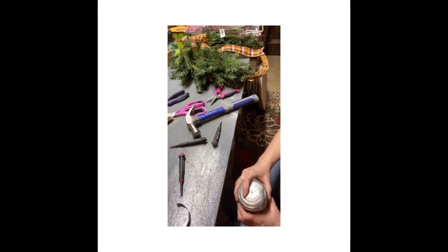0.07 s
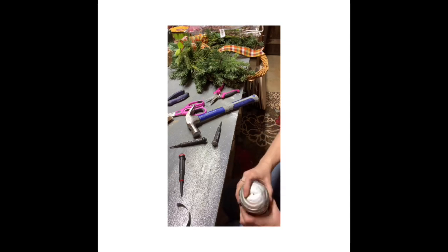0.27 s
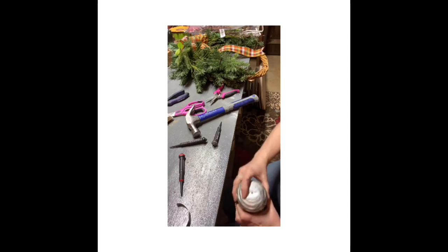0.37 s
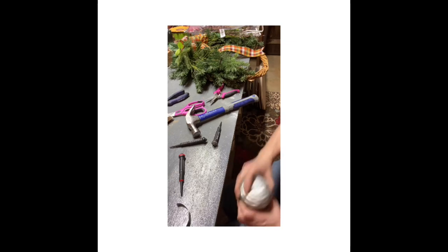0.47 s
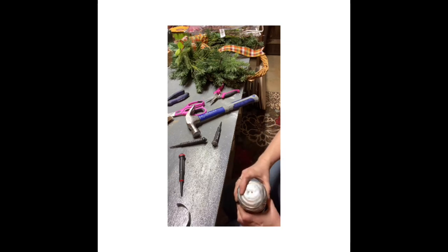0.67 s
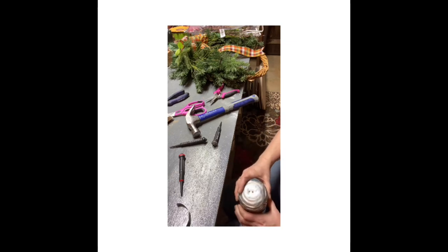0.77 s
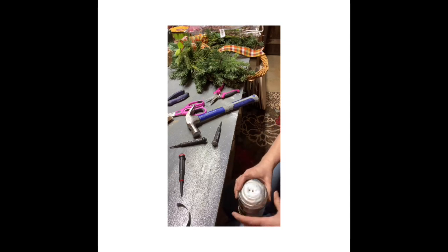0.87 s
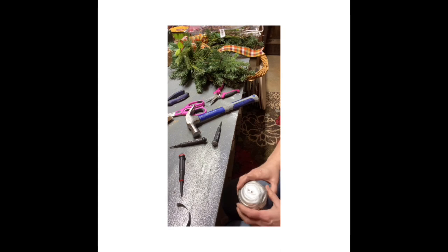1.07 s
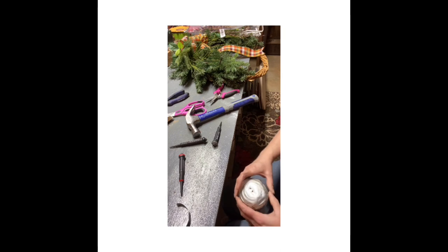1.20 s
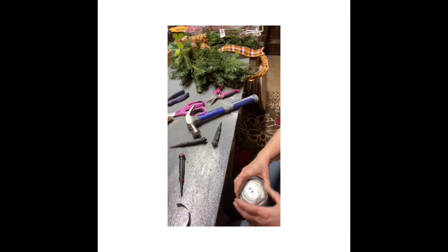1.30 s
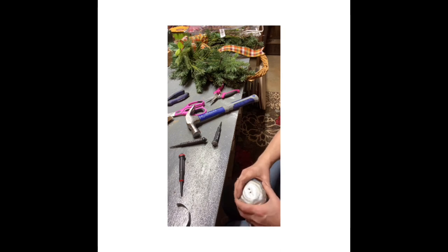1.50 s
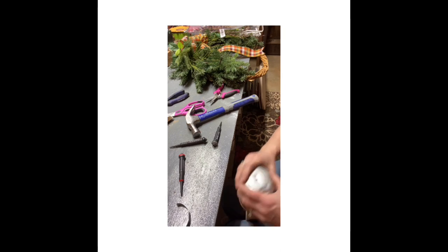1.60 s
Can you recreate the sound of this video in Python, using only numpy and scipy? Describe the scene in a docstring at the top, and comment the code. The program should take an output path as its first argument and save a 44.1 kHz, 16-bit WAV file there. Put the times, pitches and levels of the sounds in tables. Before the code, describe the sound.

A tin can pops sharply twice under the thumbs, followed by faint finger taps.

```python
"""A hand-held tin can snaps in and out as thumbs press its end, in a small workshop.
Each snap: a short swelling buzz, a crack of sheet metal, a hollow note of the air inside,
a ring of the wall and a puff of air. Then fingers shift on the can with soft taps and scuffs.
The room rings briefly over quiet air and a faint hum."""
import sys
import numpy as np
from scipy import signal
from scipy.fft import rfft, irfft
from scipy.io import wavfile

SR = 44100
rng = np.random.default_rng(int(sys.argv[2]) if len(sys.argv) > 2 else 0)


def unload_wav(signal):
    """Save mono or channel-first audio to the path in sys.argv[1] as 16-bit WAV at rate SR, clipped to [-1, 1]."""
    wavfile.write(
        sys.argv[1],
        SR,
        np.round(np.clip(np.atleast_2d(signal).T, -1, 1) * 32767).astype(np.int16),
    )


N = 72765
LEAD_S, HOLLOW_PAN_DB = .1, -4

# noise spectrum of the tin: f/Hz, relative density/dB
TIN_SPECTRUM = [(200, -12.5), (700, -7), (1100, 6.5), (1600, -4.5), (2700, 6), (3600, 3), (4600, -3.5),
                (7200, -3.5), (10000, -15), (13000, -18.5), (16000, -49.5)]


def undb(db):
    """Decibels to gain."""
    return 10 ** (np.asarray(db) / 20)


def unit(x):
    """Scale to rms 1."""
    return x / np.sqrt(np.mean(x ** 2))


def pan(db):
    """Stereo gains for a left-minus-right level."""
    return undb(np.array([[db], [-db]]) / 2)


def along(hz, table, column=1):
    """Interpolate a column over log frequency."""
    table = np.array(table, float)
    return np.interp(np.log(hz + 1), np.log(table[:, 0]), table[:, column])


def shaped(x, gain):
    """Filter by gain(f/Hz)."""
    n = x.shape[-1]
    return irfft(rfft(x) * gain(np.arange(n // 2 + 1) * SR / n), n)


def fade(t, t60_s):
    """Exponential decay."""
    return np.exp(-np.log(1000) * t / t60_s)


def clock(left_lag_s=.00003):
    """Seconds since a blow, left and right."""
    return np.maximum(np.arange(SR // 2) / SR - np.array([[left_lag_s], [0]]), 0)


def add(track, at_s, sound):
    """Mix a sound into a track that begins LEAD_S early."""
    start = max(int(round((at_s + LEAD_S) * SR)), 0)
    part = sound[..., :track.shape[1] - start]
    track[:, start:start + part.shape[-1]] += part


def soft_tone(t, hz, rise_s):
    """Padded contact: a tone swells and dies."""
    return (t / rise_s / 2) ** 2 * np.exp(2 - t / rise_s) * np.sin(2 * np.pi * hz * t)


def room_air(level_db=-66.5, wide_hz=2500):
    """Quiet noise, wider in the treble."""
    # air spectrum: f/Hz, relative density/dB
    spectrum = [(18, -50), (30, -18), (49, 2.5), (89, -7), (107, -13.5), (320, -6.5), (698, -7.5),
                (774, -9.5), (1110, -16.5), (2700, -15.5), (11000, -41.5), (15000, -49.5)]
    mid = shaped(rng.standard_normal(N), lambda f: undb(along(f, spectrum)))
    side = shaped(rng.standard_normal(N), lambda f: undb(along(f, spectrum)) * np.sqrt(f / (f + wide_hz)))
    return undb(level_db) * unit(mid + side * np.array([[1], [-1]]))


def hum():
    """Faint steady tones."""
    # f/Hz, rms level/dB
    tones = [(59.2, -82.5), (120, -79), (796.7, -75.5)]
    t = np.arange(N) / SR
    return sum(undb(db) * np.sqrt(2) * np.sin(2 * np.pi * (hz * t + rng.random())) for hz, db in tones)


def room(x, delay_s=.004, rise_s=.0013):
    """Diffuse reflections in third octaves; bass alike on both sides."""
    # reverberation: f/Hz, level/dB, t60/s, left-right correlation
    reverb = [(60, -21, 0.34, .95), (199, -16, .35, 1), (350, -14, .42, 0.41), (473, -14.5, 0.39, .8),
              (580, -18, 0.49, 0.92), (880, -11, 0.23, 0.37), (1080, -17, 0.11, .5), (1840, -11.5, 0.18, 0),
              (2541, -6, .34, 0), (3482, -17, 0.18, 0), (6300, -24, 0.39, 0.52), (9000, -27, 0.2456, 0.15),
              (15100, -32, .18, 0.054)]
    t = np.arange(int(SR * .7)) / SR
    noise = rfft(rng.standard_normal((2, len(t))))
    octave = np.log2(np.maximum(np.arange(noise.shape[1]) * SR / len(t), 1))
    onset = 1 - np.exp(-np.maximum(t - delay_s, 0) / rise_s)
    response = 0
    for hz in 50 * 2 ** (np.arange(26) / 3):
        band = np.maximum(1 - 3 * np.abs(octave - np.log2(hz)), 0)
        tail = irfft(noise * band, len(t)) * onset * fade(t, along(hz, reverb, column=2))
        mid, side = tail * np.sqrt(np.mean(band) / np.sum(tail ** 2, axis=1, keepdims=True))
        alike = along(hz, reverb, column=3)
        stereo = mid * np.sqrt((1 + alike) / 2) + side * np.sqrt((1 - alike) / 2) * np.array([[1], [-1]])
        response += undb(along(hz, reverb)) * stereo
    return signal.fftconvolve(x.mean(axis=0, keepdims=True), response, axes=1)[:, :x.shape[1]]


def wall(t, rubbed=False, t60_at_1khz_s=.33):
    """Thin ring of the can's side; the hands damp high modes faster."""
    # wall modes: f/Hz, snapped level/dB, rubbed level/dB
    modes = [(494.6, 7, -16.5), (607, 0, -10.5), (634, 1, -13.5), (765, -10, -14), (1082, -20.5, 2),
             (1457, -14.5, -8.5), (2034, -11, -2), (2435, -9, -13), (2484, -12, -10), (2597.5, -2, -4.5),
             (2900, -20.5, -8.5), (2667, 3.5, -13.5), (2734, -2, -8), (3510, -4.5, -2),
             (4150, -11.5, -10.5), (5200, -15, -4), (5840, -15.5, -14)]
    ring = 0
    for hz, snap_db, rub_db in modes:
        decay = fade(t, t60_at_1khz_s / np.cbrt(hz / 1e3))
        ring += undb(rub_db if rubbed else snap_db) * decay * np.sin(2 * np.pi * hz * t)
    return ring


def scuffs(size, attack_s=.00053, graininess=.55, finger_t60_s=.7):
    """Skin slips on the tin in grainy bursts; each contact rings the wall."""
    # slips: t/s, level/dB, decay/s, tilt/(dB/octave), relative ring/dB
    slips = [(0.400, -50, 0.066, -2, -29), (0.440, -47.5, 0.015, -1.5, -41), (0.738, -60.5, 0.018, 1, -30),
             (0.748, -60, 0.015, 7, -15), (0.770, -55, 0.0085, 5.5, -33), (0.88, -71, 0.15, -3, -31),
             (0.955, -76, 0.11, 12, -29), (0.988, -60, 0.0089, 4.5, -29), (1.068, -65, 0.012, 3, -22),
             (1.136, -46, 0.015, 0, -6.5), (1.159, -56, 0.024, -1.5, 3.5), (1.247, -69, 0.047, 5, -21),
             (1.305, -56.5, 0.01, -10, -9), (1.36, -73.5, 0.1, 7, -14), (1.466, -46, 0.0092, 11, -7.5),
             (1.51, -60, 0.011, 4, -23)]
    out, t = np.zeros((2, size)), clock()
    ring = wall(t, rubbed=True) * fade(t, finger_t60_s)
    ring = 2 * ring / np.abs(ring).max()
    onset = 1 - np.exp(-t / attack_s)
    for at_s, db, decay_s, tilt_db, ring_db in slips:
        grip = np.repeat(rng.standard_normal(t.shape[1]), 32)[:t.shape[1]]
        grains = rng.standard_normal(t.shape) * np.exp(graininess * grip)
        rub = shaped(grains, lambda f: undb(along(f, TIN_SPECTRUM) + tilt_db * np.log2(np.maximum(f, 500))))
        add(out, at_s, undb(db) * onset * (unit(rub) * np.exp(-t / decay_s) + undb(ring_db) * ring))
    return out


def taps(size):
    """Finger pads wake the hollow note and a dull thud; the hands bump lower still."""
    # finger taps: t/s, level/dB, f/Hz, relative thud/dB
    touches = [(0.98, -51, 320, -12), (1.069, -65, 604, -10), (1.137, -38, 567, -30),
               (1.157, -39.5, 575, -17), (1.191, -46, 540, -8.5), (1.225, -57, 585, -9.5),
               (1.3, -45.5, 603, -20), (1.362, -50, 570, -14), (1.511, -46, 566, -8.5)]
    # hand bumps: t/s, level/dB, f/Hz, rise/s
    bumps = [(1.07, -58.5, 42.4, 0.0061), (1.205, -64, 40, 0.005), (1.512, -66.5, 133, 0.0079)]
    out, t = np.zeros((2, size)), clock()
    thud = soft_tone(t, hz=165, rise_s=.0019)
    for at_s, db, hz, thud_db in touches:
        tap = soft_tone(t, hz, rise_s=.0011) + undb(thud_db) * thud
        add(out, at_s, undb(db) * tap * pan(HOLLOW_PAN_DB / 2))
    for at_s, db, hz, rise_s in bumps:
        add(out, at_s, undb(db) * soft_tone(t, hz, rise_s))
    return out


def puff(t, gain_db=-32.5, delay_s=.012, width_s=.0045, tail_s=.0086):
    """Displaced air: brief suction, then an ebbing push."""
    late_s = np.maximum(t - delay_s, 0)
    push = (1 - np.exp(-(late_s / width_s) ** 2)) * np.exp(-late_s / tail_s)
    suction = np.exp(-((t - delay_s) / width_s + 1) ** 2)
    return undb(gain_db) * pan(HOLLOW_PAN_DB) * (2 * push - .75 * suction)


def shimmer(t, rise_s=.0055, t60_s=.27, tilt_db_per_octave=-1):
    """Dense wall modes blur into a bright wash."""
    noise = rng.standard_normal(t.shape)
    wash = shaped(noise, lambda f: undb(along(f, TIN_SPECTRUM) + tilt_db_per_octave * np.log2(f + 1)))
    return unit(wash) * (1 - np.exp(-t / rise_s)) * fade(t, t60_s)


def buzz(tone_hz, tone_db=-3, centre_hz=2920, width_hz=1000, rise_s=.0038):
    """The strained sheet buzzes ever louder just before it gives."""
    before_s = np.arange(1024)[::-1] / SR
    noise = rng.standard_normal((2, len(before_s)))
    rasp = unit(shaped(noise, lambda f: 1 / (1 + ((f - centre_hz) / width_hz * 2) ** 2)))
    tone = undb(tone_db) * np.sin(2 * np.pi * tone_hz * before_s)
    return (rasp + tone) * np.exp(-before_s / rise_s)


def hollow(t, hz, attack_s=.0011, hold_s=.0072, release_s=.0019, sag_db_per_s=406, octave_db=-35):
    """The air in the can sounds for a few strong cycles."""
    onset = 1 - np.exp(-(t / attack_s) ** 2)
    decay = undb(-sag_db_per_s * t) * np.exp(-np.maximum(t - hold_s, 0) / release_s)
    phase = 2 * np.pi * hz * t
    return pan(HOLLOW_PAN_DB) * onset * decay * (np.sin(phase) + undb(octave_db) * np.sin(2 * phase))


def crack(t, rise_s=.0002, low_cut_hz=119):
    """The end flips over: its modes start together and die fast."""
    # modes of the end: f/Hz, level/dB, t60/s, left minus right/dB
    modes = [(218.6, -35.5, 0.064, -3.5), (381, -26, 0.055, -4.5), (735, -36, 0.041, -2),
             (1110, -25.5, 0.0058, -9), (1274, -10, 0.0051, 0), (2903, -20.5, 0.027, 1),
             (3484, -9.5, 0.0093, -3), (4020, -19.5, 0.0091, 0), (4830, -18.5, 0.01, -3.5),
             (5928, -11.5, 0.0068, 5), (6390, -18.5, 0.0093, 2), (7980, -10.5, 0.0045, -1),
             (8790, -19.5, 0.006, 9), (10540, -27, 0.006, 8.5), (12700, -20, 0.0067, 2)]
    metal = sum(undb(db) * pan(pan_db) * fade(t, t60_s) * np.sin(2 * np.pi * hz * t)
                for hz, db, t60_s, pan_db in modes)
    low_cut = signal.butter(2, low_cut_hz, "high", fs=SR, output="sos")
    return signal.sosfilt(low_cut, metal * (1 - np.exp(-t / rise_s)))


def snaps(size):
    """The end strains, then gives; the first snap is heard only dying away."""
    # snaps: t/s, hollow note/dB, crack/dB, f/Hz, buzz/dB, ring/dB, shimmer/dB
    flips = [(-0.035, -4, -6.5, 622, -26, -45.5, -39), (0.2234, -2.5, 0, 610.4, -23, -50.5, -54),
             (0.4690, -3.5, 4, 604.4, -26.5, -38, -35)]
    out, t = np.zeros((2, size)), clock()
    metal, ring = crack(t), wall(t)
    for at_s, hollow_db, crack_db, hz, buzz_db, ring_db, shimmer_db in flips:
        strain = undb(buzz_db) * buzz(hz)
        add(out, at_s - strain.shape[1] / SR, strain)
        pop = undb(hollow_db) * hollow(t, hz) + undb(crack_db) * metal
        tail = undb(ring_db) * ring + undb(shimmer_db) * shimmer(t)
        add(out, at_s, pop + tail + puff(t))
    return out


def scene():
    """The can close by, its reflections, room air and hum."""
    lead = int(LEAD_S * SR)
    can = snaps(N + lead) + taps(N + lead) + scuffs(N + lead)
    return (can + room(can))[:, lead:] + room_air() + hum()


def record(dry):
    """Round the highest peaks, cut the top treble."""
    ceiling, roll_off_hz, top_hz = .95, 15500, 16400
    limited = dry / (1 + (np.abs(dry) / ceiling) ** 8) ** (1 / 8)
    softened = signal.sosfilt(signal.butter(2, roll_off_hz, fs=SR, output="sos"), limited)
    return signal.sosfilt(signal.ellip(8, .2, 70, top_hz, fs=SR, output="sos"), softened)


dry = scene()
out = record(dry)
unload_wav(out)
```